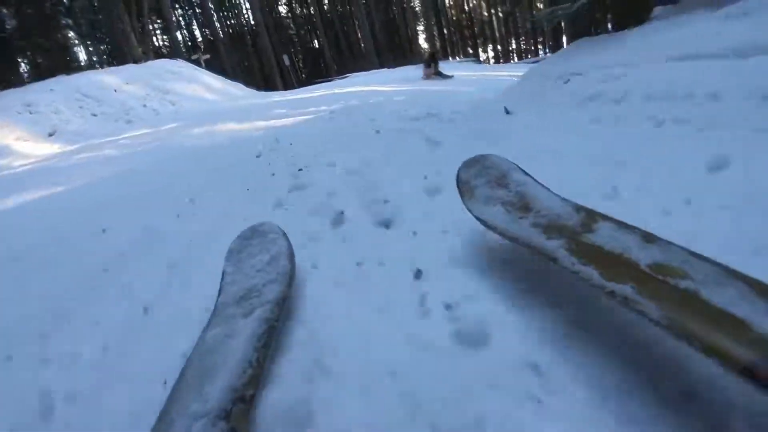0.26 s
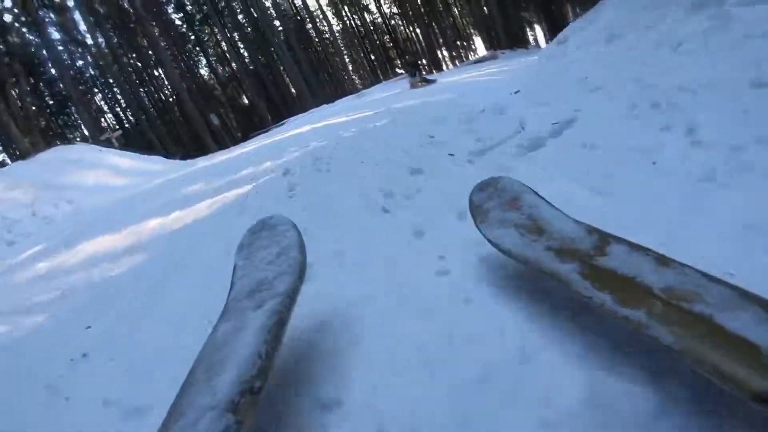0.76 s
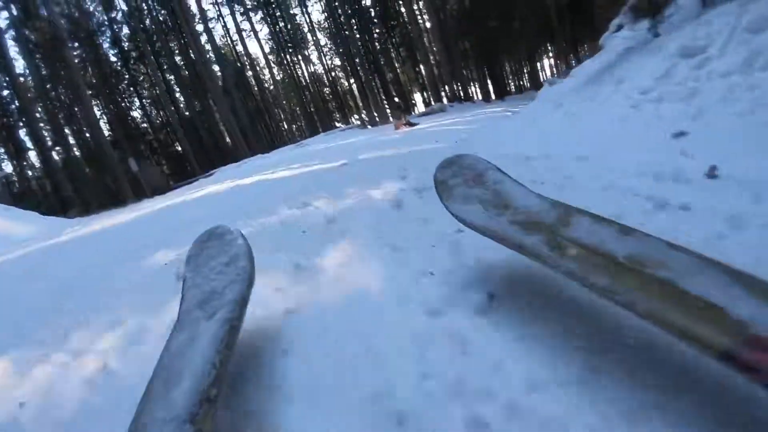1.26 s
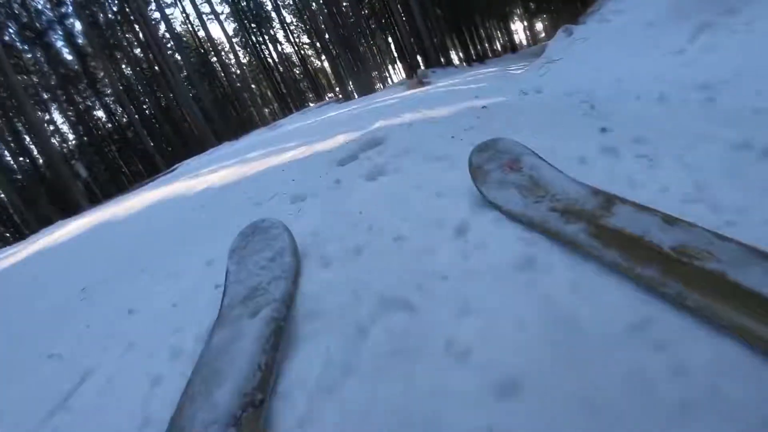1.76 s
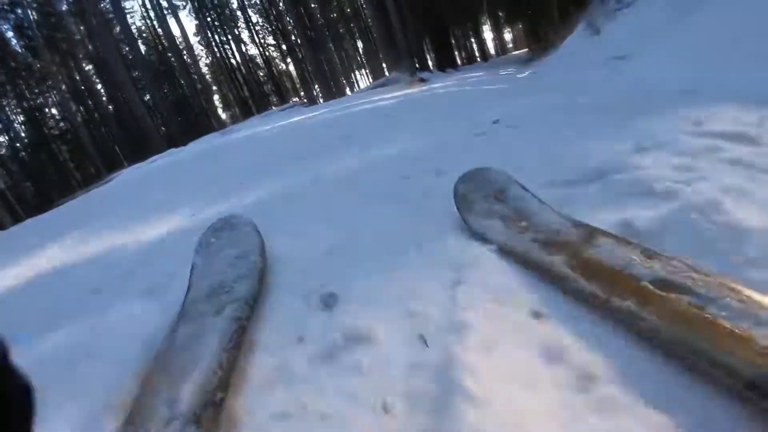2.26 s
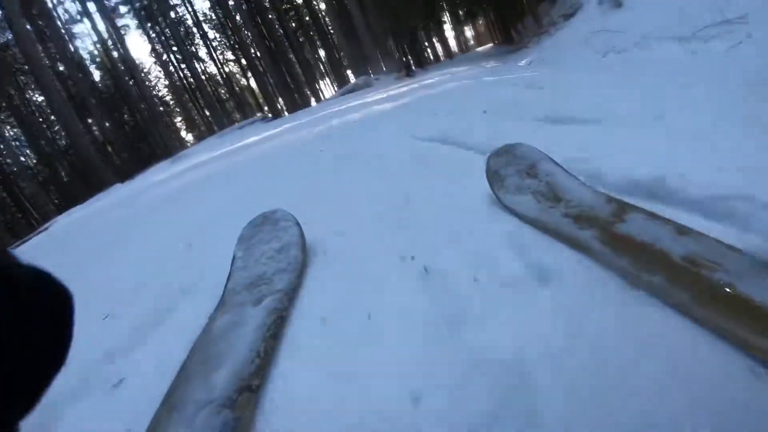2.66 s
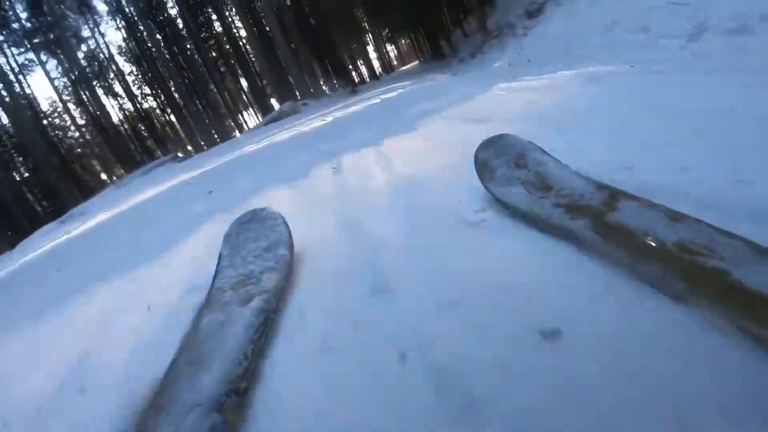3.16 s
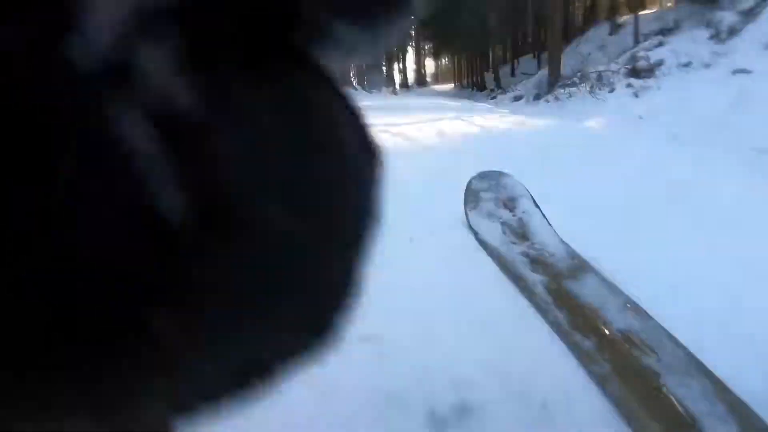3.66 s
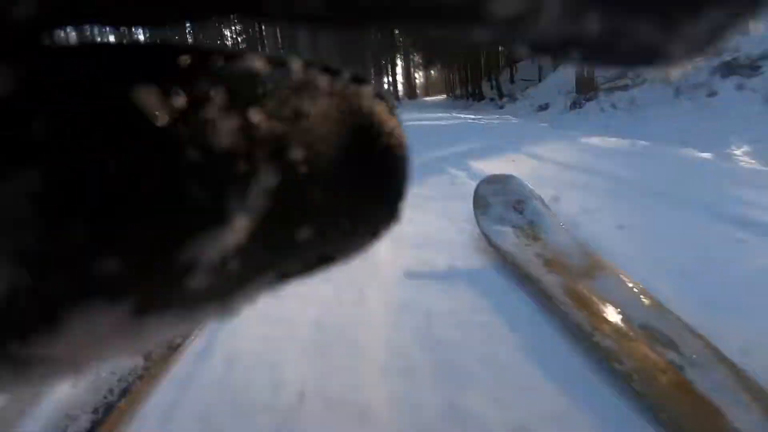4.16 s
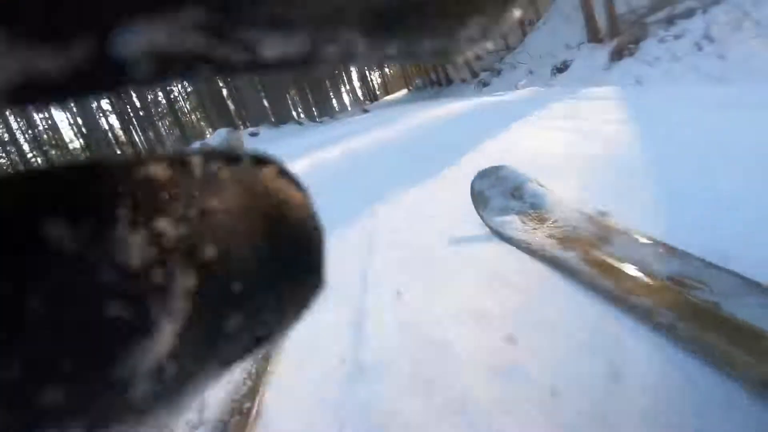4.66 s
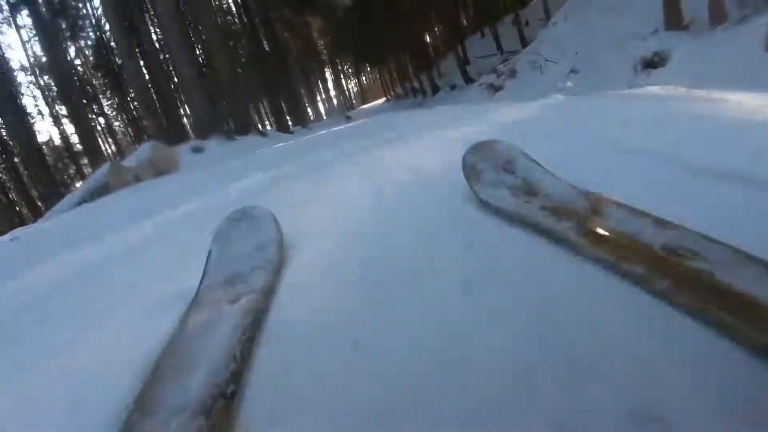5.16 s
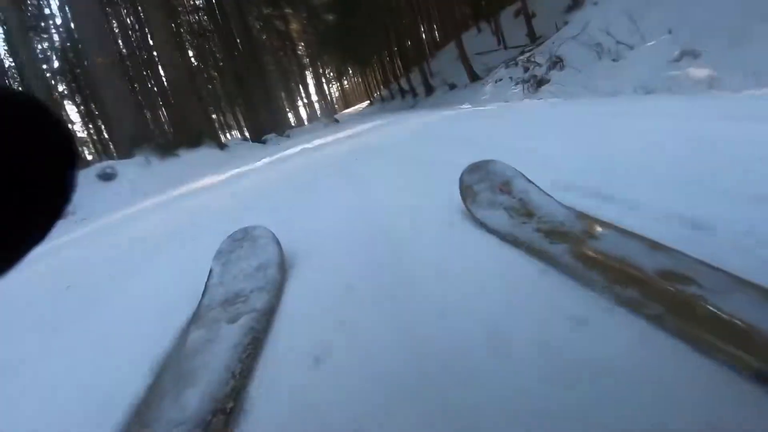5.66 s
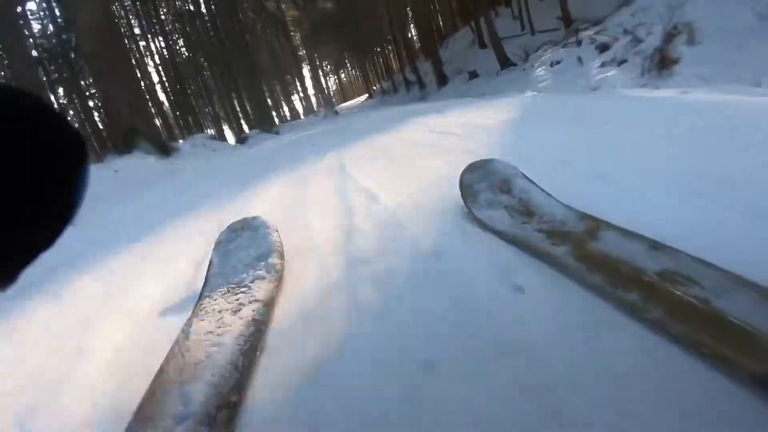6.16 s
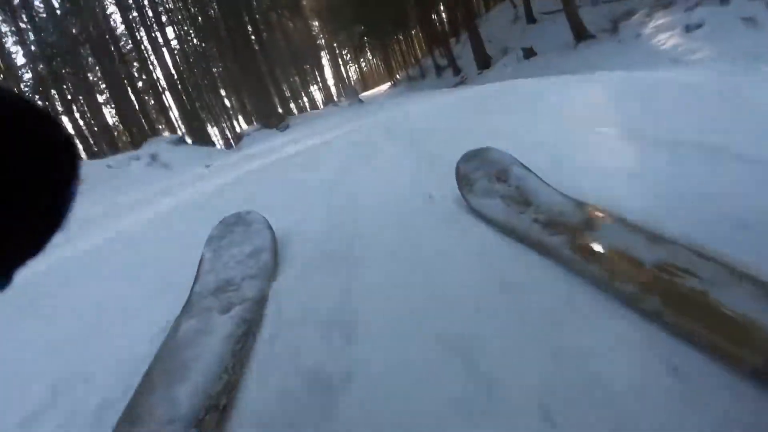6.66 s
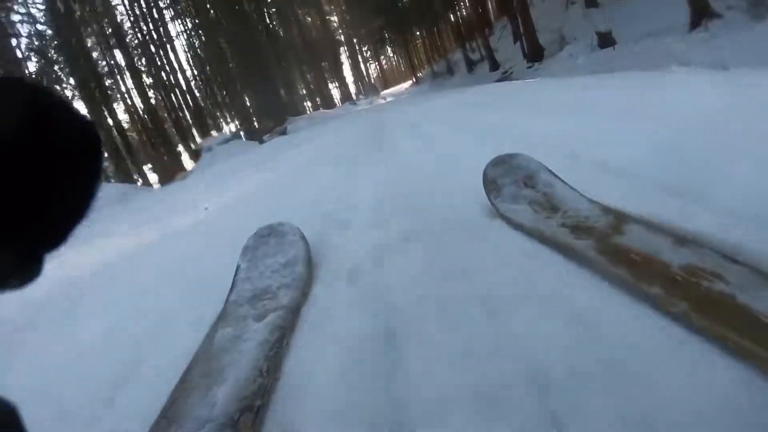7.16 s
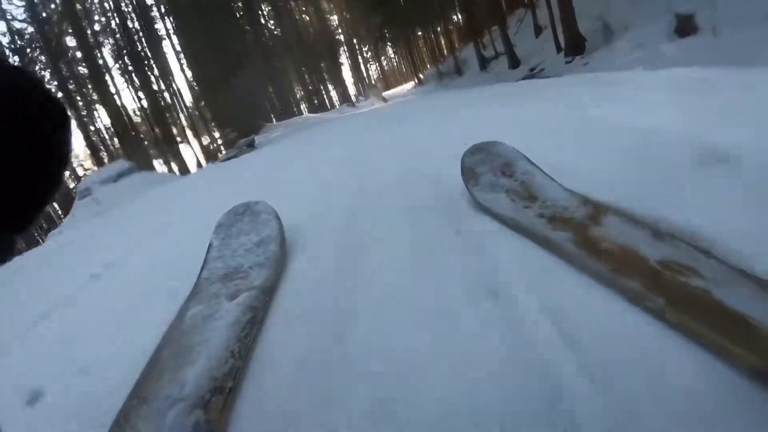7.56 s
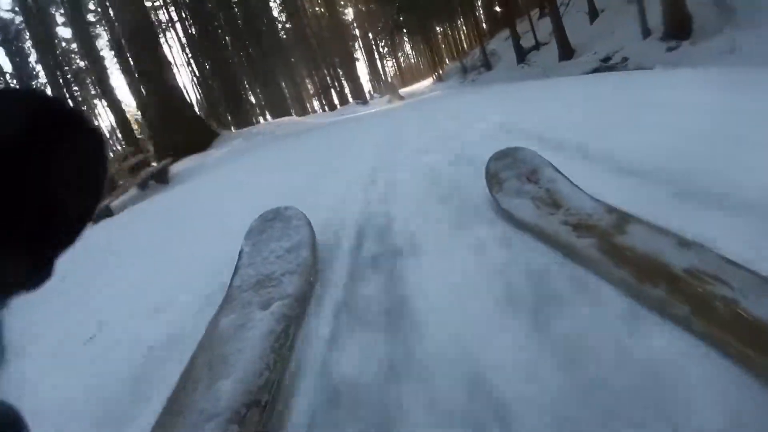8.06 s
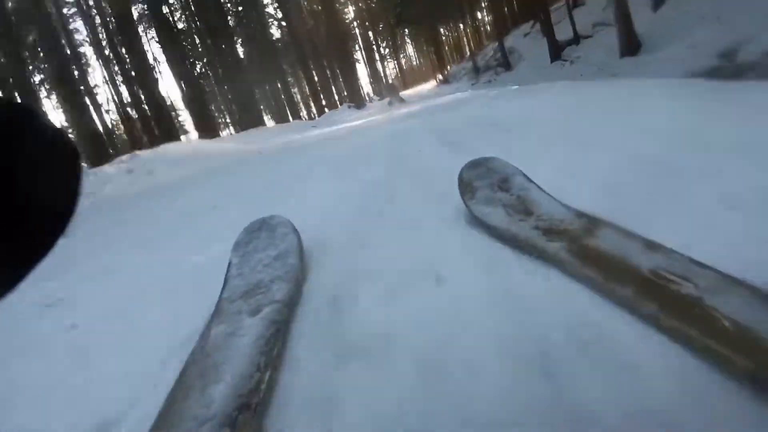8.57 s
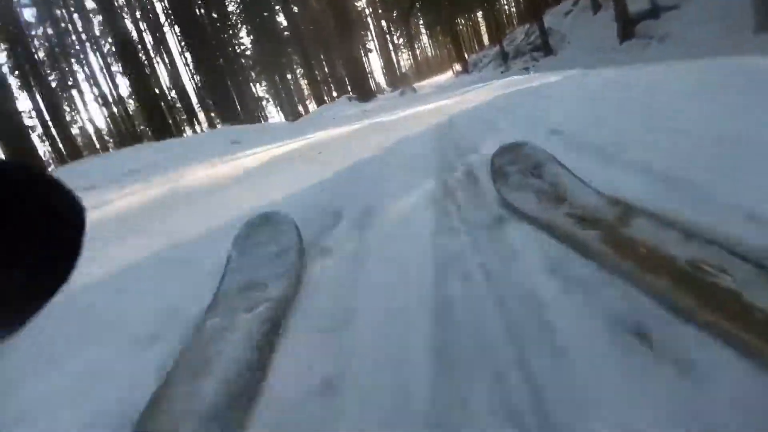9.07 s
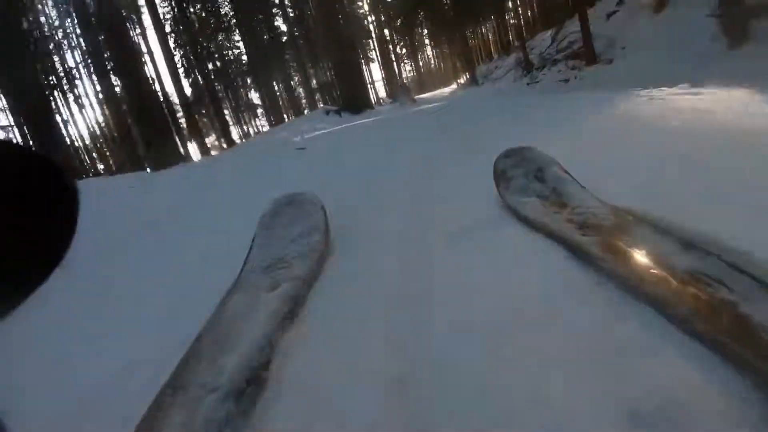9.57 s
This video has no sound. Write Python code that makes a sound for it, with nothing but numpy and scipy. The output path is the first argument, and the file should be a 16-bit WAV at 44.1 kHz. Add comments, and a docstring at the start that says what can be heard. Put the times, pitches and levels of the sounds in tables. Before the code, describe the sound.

From the rider's seat, wooden runners crush packed snow in a constant low rumble with gritty scraping and fine hiss, dipping over crests and surging in skids. Wind buffets and drones in puffs, strongest early on. Loose fittings clack, a joint creaks briefly, and a hollow roar swells in a bend around three seconds. Later, hard wooden knocks and dull thuds cluster over bumps. Close microphone, dry, no echo.

```python
"""Wooden sled runners crush and skim a packed-snow forest track at speed, heard from the rider's seat.
Coloured grain noise makes the rumble, scrape, hiss and spray; load, lifts and skids move their levels.
Wind buffets and drones at the microphone: filtered noise and a noise-driven air resonance.
Short filtered bursts make the knocks, thuds, clacks and crunches; stick-slip pulses make one creak.
Cold snow squeals, a hollow roar swells in the bend, and clothing brushes past as shaped noise."""
import sys
import numpy as np
from scipy import signal
from scipy.fft import rfft, irfft
from scipy.io import wavfile
from scipy.ndimage import uniform_filter1d

SR = 44100
rng = np.random.default_rng(int(sys.argv[2]) if len(sys.argv) > 2 else 0)


def dump(signal):
    """Clip the signal to [-1, 1] and save it as 16-bit WAV at the path in sys.argv[1]."""
    limited = np.clip(np.atleast_2d(signal).T, -1, 1)
    pcm = np.round(limited * 32767).astype(np.int16)
    wavfile.write(sys.argv[1], SR, pcm)


N = 433062
TIME = np.arange(N) / SR


def amp(db):
    """Decibels to gain."""
    return 10 ** (np.asarray(db) / 20)


def unit(x):
    """Scales to rms 1."""
    return x / np.sqrt(np.mean(x ** 2) + 1e-20)


def noise():
    """White noise over the whole scene."""
    return rng.standard_normal(N)


def follow(rows):
    """Straight-line curve through (time, value) rows, at every sample."""
    return np.interp(TIME, *np.transpose(rows))


def swells(rows):
    """Gain made of bell-shaped strokes, from rows of (middle [s], bell spread [s], level [dB])."""
    coarse = TIME[::SR // 1000]  # about one point per millisecond is smooth enough
    bells = sum(amp(db) * np.exp(-((coarse - middle) / spread) ** 2 / 2) for middle, spread, db in rows)
    return np.interp(TIME, coarse, bells)


def stroke(start, length, attack_s, release_s):
    """Rises to 1 from the start, holds until the length is over, then falls back."""
    end = start + max(length, attack_s)
    return np.interp(TIME, [start, start + attack_s, end, end + release_s], [0, 1, 1, 0])


def add(mix, s, sound):
    """Mixes a sound in at time s."""
    part = mix[max(round(s * SR), 0):][:len(sound)]
    part += sound[:len(part)]


def colour(x, spectrum):
    """Minimum-phase filter through (frequency, gain) points, so that clicks keep their attack."""
    size = 8192
    hz, db = np.transpose(spectrum)
    log_hz = np.log(hz)
    at = np.log(abs(np.fft.fftfreq(size, 1 / SR)) + 1)
    # outside the table the gain keeps falling, down to a floor of -100 dB
    beyond = np.maximum(at - log_hz[-1], 0) + np.maximum(log_hz[0] - at, 0)
    gain_db = np.maximum(np.interp(at, log_hz, db) - 25 * beyond, -100)
    log_gain = np.log(amp(gain_db))
    taps = np.fft.ifft(np.exp(np.conj(signal.hilbert(log_gain)))).real[:size // 2]
    return signal.oaconvolve(x, taps)[:len(x)]


def wander(lo_hz, hi_hz):
    """Random drift of rms 1, mostly between two rates."""
    hz = np.fft.rfftfreq(N, 1 / SR)
    shape = hz / (hz + lo_hz) / np.sqrt(hz + lo_hz) / (1 + (hz / hi_hz) ** 2)
    return unit(irfft(rfft(noise()) * shape, N))


def grains(per_s, spread_db, wash):
    """Breaking snow crystals: clicks of very unequal size over a wash of countless tiny ones."""
    size = amp(spread_db * np.minimum(rng.exponential(1, N), 4.5))
    clicks = size * rng.choice([-1, 1], N) * (rng.random(N) < per_s / SR)
    return unit(unit(clicks) + wash * noise())


def patches(x, depth_db, count_frames, count_bins):
    """The colour drifts in patches as the contact moves along the runner."""
    z = signal.stft(x, nperseg=512)[2]
    field = rng.standard_normal(z.shape)
    for _ in range(2):
        field = uniform_filter1d(field, count_bins, 0)
        field = uniform_filter1d(field, count_frames, 1)
    return signal.istft(z * amp(depth_db * unit(field)), nperseg=512)[1][:N]


def blow(spectrum, decay_s, grit):
    """A sudden push followed by a dying crumble, through a body; peak 1."""
    t = np.arange(SR // 4) / SR
    push = grit * rng.standard_normal(len(t)) * np.exp(-t / decay_s)
    push[0] += 1
    sound = colour(push, spectrum)
    return sound / abs(sound).max()


# weight of the sled on the snow, rising in bends and dips: (time [s], load [dB])
LOAD_CURVE = [(0.0, 5), (0.25, 0.5), (0.65, -3), (1.17, 1), (1.55, -8), (2.3, 0), (2.63, -1.5), (3.2, -1),
              (3.5, 2), (4.35, -2), (4.68, 3.5), (5.3, -3.5), (5.6, 2), (6.02, -3.5), (6.22, 4.5),
              (6.45, 0.5), (6.9, 0), (7.3, 2.5), (7.85, 2.5), (8.45, 0.5), (8.9, 3.5), (9.82, -0.5)]
# the runners go light over a crest, then touch down; the drop is that of scrape and hiss:
# (start [s], length [s], drop [dB], time to unload [s])
CREST_LIFTS = [(0.13, 0.12, 1.5, 0.045), (0.746, 0.22, 7.5, 0.087), (1.245, 0.22, 6.5, 0.049),
               (1.64, 0.053, 2.5, 0.031), (2.14, 0.098, 3, 0.037), (2.529, 0.17, 3, 0.03),
               (3.932, 0.21, 2.5, 0.1), (4.264, 0.087, 2.5, .035), (6.525, .092, 5.5, 0.011),
               (7.056, 0.034, 4, 0.017), (7.74, 0.123, 2.5, .05), (8.289, 0.15, 4.5, 0.13),
               (8.696, 0.044, 3, 0.047), (8.994, 0.071, 8, 0.061), (9.262, 0.2, 4, 0.12),
               (9.694, .16, 3.5, 0.046)]
# a runner slips sideways and shaves the snow: (start [s], length [s], scrape change [dB], hiss change [dB])
SIDE_SKIDS = [(-.02, 0.15, 4.5, 5.5), (0.332, 0.13, 2.5, 5), (0.638, 0.16, 6, -2), (1.05, 0.13, -4, 4.5),
              (1.16, 0.09, 7, -3.5), (1.468, 0.16, 6, 1.5), (1.732, 0.38, 3, 3), (3.375, 0.13, 3, 3),
              (4.403, 0.1, -2.5, 8.5), (4.753, 0.23, 3.5, 2), (6.67, 0.2, 4.5, 2.5),
              (7.516, 0.16, 2.5, 2.5), (8.11, 0.21, 3.5, 0.5), (8.544, 0.15, 7, 5), (8.742, 0.26, 5, 4.5),
              (9.045, 0.21, 4, 8), (9.46, 0.2, 1, 6.5)]
# gliding hiss before lifts, skids and jolts: (time [s], level [dB])
HISS_LEVEL = [(0, -39.5), (1.9, -39.5), (2.5, -40), (3.0, -39.5), (4.7, -44), (5.3, -42), (5.7, -39),
              (6.05, -41), (6.9, -38.5), (9.82, -40)]
# thrown powder before lifts and jolts, highest in the long bend: (time [s], level [dB])
POWDER_LEVEL = [(0, -51), (.7, -60.5), (1.9, -53), (3.45, -50.5), (4.1, -53), (4.8, -59.5), (5.8, -52.5),
                (9.82, -54)]
# level at load 0 [dB], dB gained per dB of load, dB lost per dB of lift
RUMBLE_DB, RUMBLE_PER_LOAD, RUMBLE_PER_LIFT = -27.5, 1.3, 0.89
SCRAPE_DB, SCRAPE_PER_LOAD, SCRAPE_PER_LIFT = -35, 0.99, 1
SPRAY_PER_LIFT = 3
TOUCHDOWN_S, SKID_BITE_S, SKID_RELEASE_S = 0.012, 0.06, 0.04


def contact():
    """Layer levels in dB: load presses rumble and scrape, skids shift scrape and hiss, lifts drop all."""
    load = follow(LOAD_CURVE)
    lift = sum(db * stroke(s, length, unload_s, TOUCHDOWN_S) for s, length, db, unload_s in CREST_LIFTS)
    rumble_db = RUMBLE_DB + RUMBLE_PER_LOAD * load - RUMBLE_PER_LIFT * lift
    scrape_db = SCRAPE_DB + SCRAPE_PER_LOAD * load - SCRAPE_PER_LIFT * lift
    hiss_db = follow(HISS_LEVEL) - lift
    spray_db = follow(POWDER_LEVEL) - SPRAY_PER_LIFT * lift
    for s, length, scrape_change_db, hiss_change_db in SIDE_SKIDS:
        skid = stroke(s, length, SKID_BITE_S, SKID_RELEASE_S)
        scrape_db = scrape_db + scrape_change_db * skid
        hiss_db = hiss_db + hiss_change_db * skid
    return rumble_db, scrape_db, hiss_db, spray_db


# colour of the wooden frame, also heard in the thuds: (frequency [Hz], gain [dB])
FRAME_COLOUR = [(60, -24.5), (120, -1.5), (175, 0.5), (240, -1.5), (310, -9), (400, -12), (560, -20.5),
                (1400, -62)]


def rumble(level_db):
    """Lumps in the track shake the frame, which passes on mainly the low frequencies."""
    lumps = grains(per_s=900, spread_db=2.5, wash=0.78)
    return unit(colour(lumps, FRAME_COLOUR)) * amp(level_db)


CRUMB_LOW_HZ, CRUMB_HIGH_HZ, CRUMB_OVER_SCRAPE_DB = 524, 1790, -6.5


def crumbs(per_s, spread_db, decay_s, count):
    """Small clods burst at random, each kind with its own pitch and a short crumbling tail."""
    out = np.zeros(N)
    for hz in np.geomspace(CRUMB_LOW_HZ, CRUMB_HIGH_HZ, count):
        body = [(hz / 2, -14), (hz, 0), (hz * 2, -18), (10000, -65)]
        size = amp(spread_db * np.minimum(rng.exponential(1, N), 3))
        clod = blow(body, decay_s, grit=.5)
        bursts = size * (rng.random(N) < per_s / count / SR)
        out += signal.oaconvolve(bursts, clod)[:N]
    return unit(out)


# colour of breaking crust, also heard in the crunches: (frequency [Hz], gain [dB])
CRUST_COLOUR = [(200, -9.5), (450, -4.5), (760, 0.5), (1150, -7), (1500, -9), (1800, -8), (2350, -18.5),
                (3200, -19.5), (6000, -22), (8500, -56.5), (12000, -92)]


def scrape(level_db):
    """Crust breaks under the runner edges in a dense, patchy grain, with loose clods crushed among it."""
    crust = grains(per_s=2600, spread_db=1.5, wash=0.76)
    crust = patches(crust, depth_db=2.8, count_frames=7, count_bins=4)
    clods = amp(CRUMB_OVER_SCRAPE_DB) * crumbs(per_s=140, spread_db=3, decay_s=0.0019, count=8)
    return (unit(colour(crust, CRUST_COLOUR)) + clods) * amp(level_db)


# colour of the gliding hiss: (frequency [Hz], gain [dB])
GLIDE_COLOUR = [(700, -6.5), (2000, -4.5), (3200, -10), (3900, -2.5), (5300, -5), (6350, -4), (7100, -19.5),
                (8500, -27.5), (10000, -52.5), (12000, -81.5)]
# icy spots that rasp briefly: (middle [s], bell spread [s], level [dB])
ICY_RASPS = [(.535, 0.0031, -33), (2.31, 0.013, -36), (5.597, 0.002, -32), (6.518, .011, -35.5),
             (6.757, 0.017, -34), (8.91, 0.023, -30.5), (9.141, 0.0037, -24), (9.425, 0.0075, -35)]


def hiss(level_db):
    """Fine crystals shear under the gliding runners; icy spots swell the same hiss into a rasp."""
    crystals = grains(per_s=5000, spread_db=1.0, wash=0.7)
    crystals = patches(crystals, depth_db=1.5, count_frames=10, count_bins=7)
    return unit(colour(crystals, GLIDE_COLOUR)) * np.hypot(amp(level_db), swells(ICY_RASPS))


# colour of the thrown powder: (frequency [Hz], gain [dB])
SPRAY_COLOUR = [(5000, -20.5), (6700, 4.5), (7400, -4), (8400, -5.5), (10000, -15), (11500, -31.5),
                (14500, -49)]


def spray(level_db):
    """Thrown powder patters as bright, uneven grains."""
    powder = grains(per_s=2500, spread_db=2.5, wash=0.7)
    return unit(colour(powder, SPRAY_COLOUR)) * amp(level_db)


def runners():
    """Rumble, scrape, hiss and spray follow the snow contact; one uneven track jolts them all."""
    rumble_db, scrape_db, hiss_db, spray_db = contact()
    jolt = wander(lo_hz=3.6, hi_hz=53.6)
    # each factor is the layer's rms jolt in dB
    low = rumble(rumble_db + 3.14 * jolt) + scrape(scrape_db + 0.62 * jolt)
    high = hiss(hiss_db + 1.4 * jolt) + spray(spray_db + 1.7 * jolt)
    return low + high


def air_resonance(hz, width_hz, steadiness):
    """Turbulence rings an air resonance; its swing saturates and its pitch sways with the flow."""
    r = np.exp(-np.pi * width_hz / SR)
    swing = noise() + 1j * noise()
    swing = signal.lfilter([1], np.poly([r, r]), swing)
    swing /= abs(swing).mean()
    swing /= (1 + abs(swing) ** 2) ** (steadiness / 2)
    turns = np.cumsum(hz * (1 + 0.063 * wander(lo_hz=7.6, hi_hz=9.4))) / SR
    return unit((swing * np.exp(2j * np.pi * turns)).real)


# gusts on the microphone, to which buffet and drone are set: (time [s], level [dB])
GUST_LEVEL = [(0.0, -23), (1.28, -30), (1.46, -45), (1.68, -26), (1.9, -48), (2.06, -30.5), (2.6, -34.5),
              (2.78, -28), (3.0, -22.5), (3.76, -31), (3.96, -23), (4.32, -38), (4.64, -24.5), (5.8, -31.5),
              (6.2, -27), (7.5, -24), (8.95, -23.5), (9.82, -26.5)]
# puffs of air that set the hollow drone ringing: (middle [s], bell spread [s], level [dB])
DRONE_PUFFS = [(.08, 0.04, -19.5), (.255, 0.019, -15), (0.439, 0.035, -13), (.6, 0.029, -14),
               (.73, 0.05, -17.5), (1.18, 0.066, -25.5), (1.355, 0.036, -17), (2.03, 0.027, -16),
               (2.17, 0.07, -21.5), (2.315, 0.024, -13), (2.49, 0.084, -20.5), (2.87, 0.093, -16),
               (3.55, 0.25, -25), (6.17, 0.062, -21.5), (7.28, 0.11, -24), (9.03, 0.15, -23.5)]
# colour of the buffeting: (frequency [Hz], gain [dB])
BUFFET_COLOUR = [(14, -25.5), (25, -20), (33, 4.5), (45, -6), (80, -4), (115, -8), (200, -32), (500, -57)]
BUFFET_OVER_GUST_DB, DRONE_OVER_GUST_DB = 1, -5.5


def wind():
    """Low buffeting and an unsteady drone follow the gusts; the drone also swells with each puff."""
    gust_db = follow(GUST_LEVEL)
    buffet = unit(colour(noise(), BUFFET_COLOUR)) * amp(gust_db + BUFFET_OVER_GUST_DB)
    flow = np.hypot(swells(DRONE_PUFFS), amp(gust_db + DRONE_OVER_GUST_DB))
    drone = air_resonance(hz=133.4, width_hz=32, steadiness=0.62) * flow
    return buffet + drone


# the frame's swing after a thud: pitch, its random spread (share of the pitch), swell time, gain
BOOM_HZ, BOOM_SPREAD, BOOM_SWELL_S, BOOM_SHARE = 205, .14, 0.0098, 0.5


def thud():
    """A dull push through the frame, which swings up and dies within a few cycles."""
    t = np.arange(SR // 4) / SR
    hz = BOOM_HZ * (1 + BOOM_SPREAD * rng.uniform(-1.2, 1))
    swell = t / BOOM_SWELL_S * np.exp(1 - t / BOOM_SWELL_S)
    boom = swell * np.sin(2 * np.pi * hz * t)
    return BOOM_SHARE * boom + .5 * blow(FRAME_COLOUR, decay_s=0.04, grit=0.083)


# bumps that strike the runners: (time [s], knock peak [dB], thud gain [dB], ring of the struck spot [Hz])
RUNNER_BUMPS = [(.022, -14.5, -28, 780), (1.222, -25, -16, 600), (3.043, -17, -21, 760),
                (3.901, -23, -10.5, 600), (4.599, -19, -16, 520), (4.644, -32, -10, 550),
                (4.674, -28, -28, 634), (4.931, -13.5, -5, 510), (5.456, -13, -10.5, 620),
                (5.772, -22, -13.5, 550), (6.206, -18, -23, 745), (6.31, -14, -19, 720),
                (6.366, -11, -24, 700), (6.442, -15.5, -9, 580), (6.635, -11.5, -11.5, 560),
                (7.113, -33, -12, 600), (7.17, -22, -11.5, 705), (7.24, -11.5, -17, 620),
                (7.262, -14.5, -8, 527), (7.303, -13.5, -10.5, 780), (8.763, -18, -9, 600),
                (9.08, -10.5, -9.5, 604), (9.237, -12.5, -28, 750), (9.434, -17.5, -13, 533),
                (9.598, -14, -17, 665)]
# colour of a knock whose spot rings at 600 Hz, stretched for other rings: (frequency [Hz], gain [dB])
KNOCK_COLOUR = [(200, -5), (480, -1.5), (600, 1.5), (750, -4), (980, -13), (1800, -16), (2600, -28),
                (6000, -48), (10000, -85)]
KNOCK_RING_HZ = 600


def knocks():
    """Each bump knocks on the wooden runner at its own pitch and thuds through the frame."""
    out = np.zeros(N)
    for s, knock_db, thud_db, ring_hz in RUNNER_BUMPS:
        wood = [(hz * ring_hz / KNOCK_RING_HZ, db) for hz, db in KNOCK_COLOUR]
        add(out, s, amp(knock_db) * blow(wood, decay_s=.011, grit=.28))
        add(out, s, amp(thud_db) * thud())
    return out


# colour of the dry crack of a fitting: (frequency [Hz], gain [dB])
FITTING_COLOUR = [(250, -23), (560, -1), (780, 2), (1200, -12.5), (1700, 0), (2300, -9.5), (3200, -18.5),
                  (6200, -17), (7600, -31), (11000, -73)]
CHATTER_SHARE, CHATTER_DECAY_S = 0.36, 0.0064


def clack(ring_hz):
    """A loose fitting strikes the wood: a dry crack with a short rough chatter around its own pitch."""
    ring = [(ring_hz / 1.5, -24), (ring_hz, 0), (ring_hz * 1.25, -22)]
    chatter = blow(ring, CHATTER_DECAY_S, grit=1)
    return CHATTER_SHARE * chatter + blow(FITTING_COLOUR, decay_s=0.0026, grit=0.94)


# woody clacks of the fittings: (time [s], crack peak [dB], chatter pitch [Hz])
FITTING_CLACKS = [(.912, -24.5, 1700), (0.951, -21.5, 1800), (.986, -23, 1600), (1, -25, 1770),
                  (1.4905, -17.5, 1600), (1.5038, -16, 1770), (1.538, -19.5, 1420), (1.8025, -23, 1740),
                  (1.915, -12, 2260), (3.043, -17, 1770), (3.283, -31, 1710), (5.5974, -18.5, 2300),
                  (6.3167, -16, 2600), (7.033, -21, 1750), (9.1379, -20, 2140)]


def clacks():
    """The loose fittings clack one by one."""
    out = np.zeros(N)
    for s, db, ring_hz in FITTING_CLACKS:
        add(out, s, amp(db) * clack(ring_hz))
    return out


# colour of the creaking joint, one low and one high resonance: (frequency [Hz], gain [dB])
JOINT_COLOUR = [(150, 16), (290, 10), (380, -6), (650, -6), (1100, -17), (1450, -5), (1800, -15),
                (3600, -30)]
CREAK_START_S, CREAK_LENGTH_S, CREAK_DB = 1.581, 0.08, -27
# slip rate at first and at its top, time to the top, random share of the rate
CREAK_SLIPS_HZ, CREAK_TOP_HZ, CREAK_TOP_AFTER_S, CREAK_JITTER = 255, 382, 0.055, 0.03
CREAK_ATTACK_S, CREAK_FADE_DB_PER_S = 0.0032, 51


def creak():
    """After a landing a joint sticks and slips, speeding up then easing off, and rings the wood."""
    age = np.clip(TIME - CREAK_START_S, 0, CREAK_LENGTH_S)
    rise = np.sin(np.pi / 2 * age / CREAK_TOP_AFTER_S)
    slips_hz = CREAK_SLIPS_HZ + (CREAK_TOP_HZ - CREAK_SLIPS_HZ) * rise
    slips = np.cumsum(slips_hz * (1 + CREAK_JITTER * wander(lo_hz=30, hi_hz=200))) / SR
    pulses = np.diff(np.floor(slips), prepend=0)  # one pulse per completed slip
    strain = stroke(CREAK_START_S, CREAK_LENGTH_S, CREAK_ATTACK_S, CREAK_ATTACK_S)
    wood = colour(pulses - pulses.mean(), JOINT_COLOUR)
    wood = wood / wood[strain > 0].std()
    return wood * amp(CREAK_DB - CREAK_FADE_DB_PER_S * age) * strain


# swells of the hollow roar through the bend: (middle [s], bell spread [s], level [dB])
ROAR_SWELLS = [(2.32, 0.11, -34), (2.53, 0.066, -31.5), (2.86, 0.1, -28), (3.13, 0.18, -32)]
# colour of the hollow roar: (frequency [Hz], gain [dB])
HOLLOW_COLOUR = [(170, -29), (245, 1.5), (305, -10.5), (350, 5), (412, -4), (450, -36), (700, -44)]


def roar():
    """Wind noise with hollow resonances swells above the drone through the bend."""
    return unit(colour(noise(), HOLLOW_COLOUR)) * swells(ROAR_SWELLS)


# lumps of crust that break under a runner: (time [s], peak [dB])
CRUST_CRUNCHES = [(2.405, -21.5), (5.457, -19), (6.699, -17), (6.771, -20), (7.169, -13), (8.788, -18),
                  (9.094, -16)]


def crunches():
    """Each lump of crust gives way in one gritty, quickly dying burst."""
    out = np.zeros(N)
    for s, db in CRUST_CRUNCHES:
        add(out, s, amp(db) * blow(CRUST_COLOUR, decay_s=0.012, grit=1))
    return out


# cold snow squeals under a runner's edge: (middle [s], bell spread [s], level [dB])
SNOW_SQUEALS = [(2.9, 0.045, -33.5), (3.65, 0.13, -41), (6.22, 0.14, -38), (7.4, 0.0096, -32),
                (9.54, 0.073, -36)]
# colour of the squeal: (frequency [Hz], gain [dB])
SQUEAL_COLOUR = [(900, -19), (1450, -6.5), (1850, -2.5), (2150, -17), (3200, -16)]


def squeals():
    """Cold snow breaks in very unequal grains, narrowed to a squeal under the edge."""
    snow = grains(per_s=1400, spread_db=5.5, wash=0.25)
    return unit(colour(snow, SQUEAL_COLOUR)) * swells(SNOW_SQUEALS)


# sleeves and legs brushing by: (middle [s], bell spread [s], level [dB])
CLOTH_BRUSHES = [(3.48, 0.059, -35), (4.23, 0.079, -39), (4.483, 0.064, -37), (4.814, 0.077, -32.5)]
# colour of the fabric: (frequency [Hz], gain [dB])
CLOTH_COLOUR = [(600, -20), (1300, -9), (1700, 5.5), (2400, 3), (3600, 0), (6000, -16), (8000, -52),
                (12000, -87)]


def clothing():
    """Stiff fabric rasps in short strokes of rough grains."""
    fabric = grains(per_s=2700, spread_db=4.0, wash=0.35)
    return swells(CLOTH_BRUSHES) * unit(colour(fabric, CLOTH_COLOUR))


def scene():
    """Everything is close and dry: snow gives no echo."""
    sled = runners() + knocks() + clacks() + creak() + crunches() + squeals()
    air = wind() + roar()
    return (sled + air + clothing())[None]


def record(dry):
    """The recorder's band limit: a steep low-pass at 15 kHz."""
    taps = signal.firwin(511, 15000, window=("kaiser", 9), fs=SR)
    return signal.oaconvolve(dry, taps[None], "same")


dry = scene()
out = record(dry)
dump(out)
```